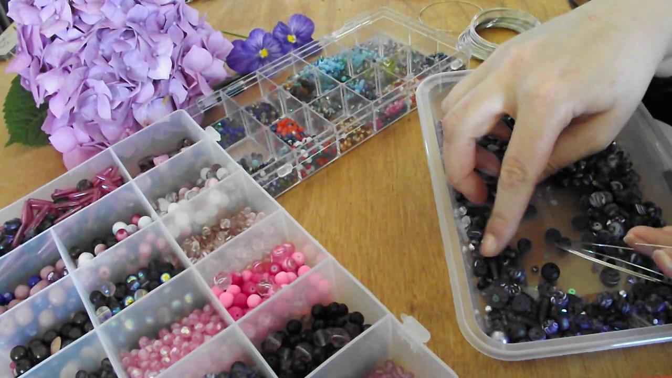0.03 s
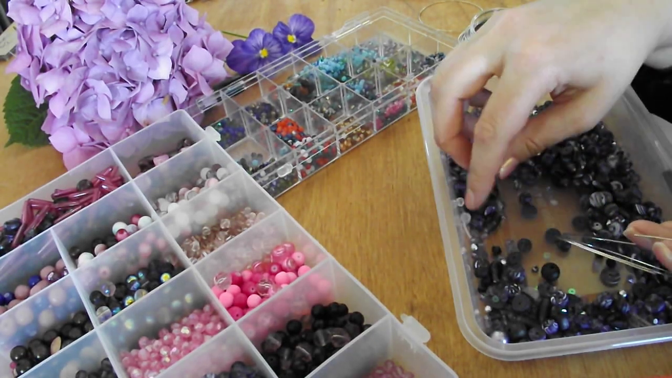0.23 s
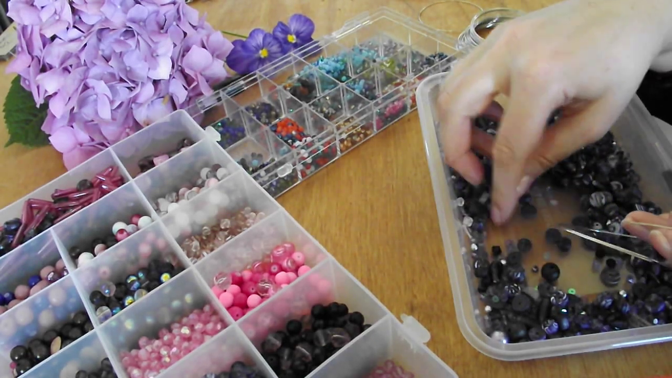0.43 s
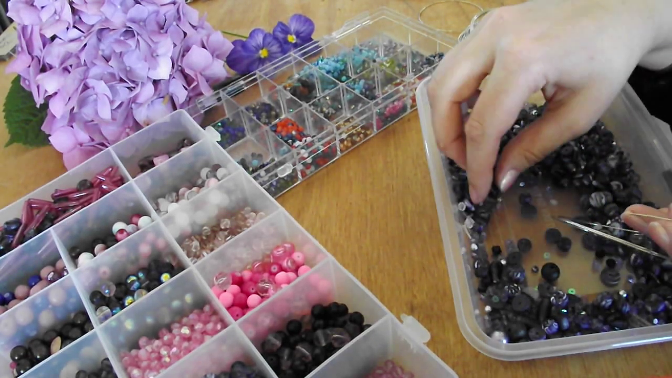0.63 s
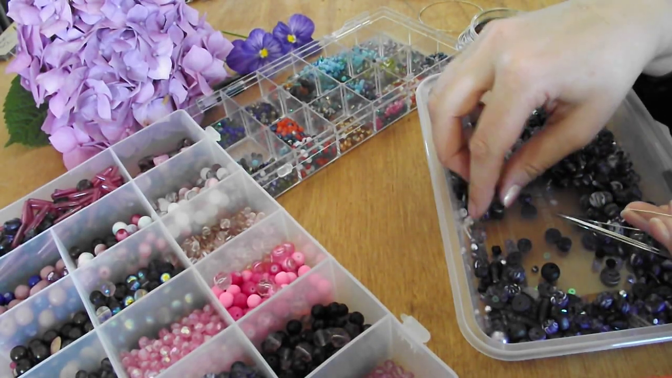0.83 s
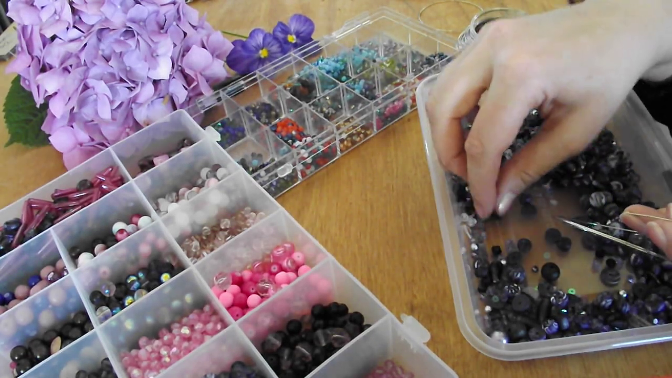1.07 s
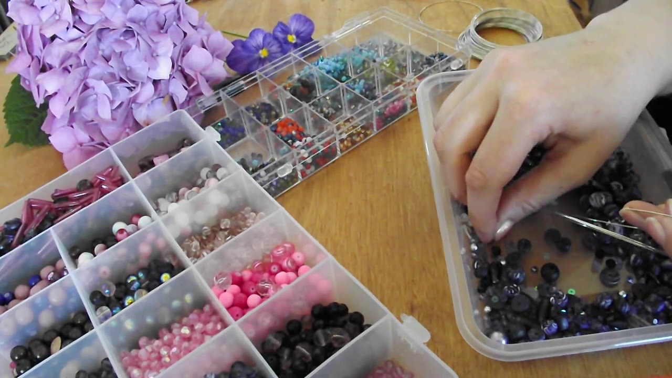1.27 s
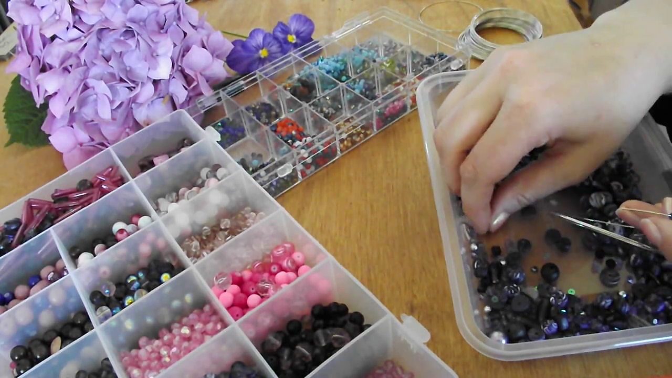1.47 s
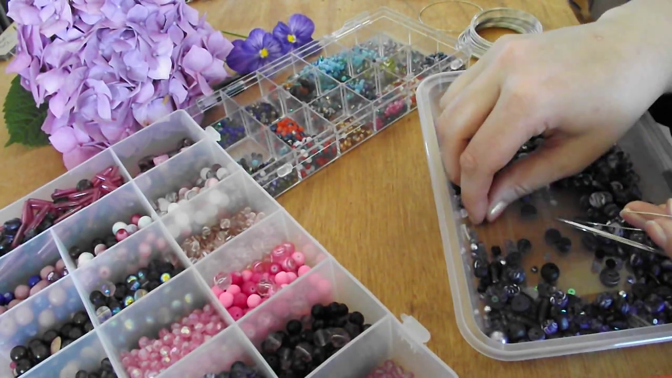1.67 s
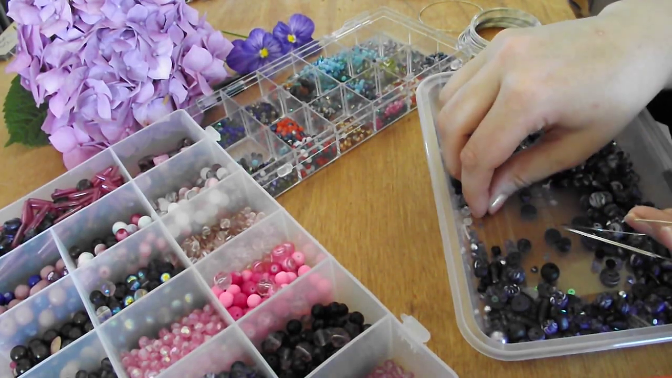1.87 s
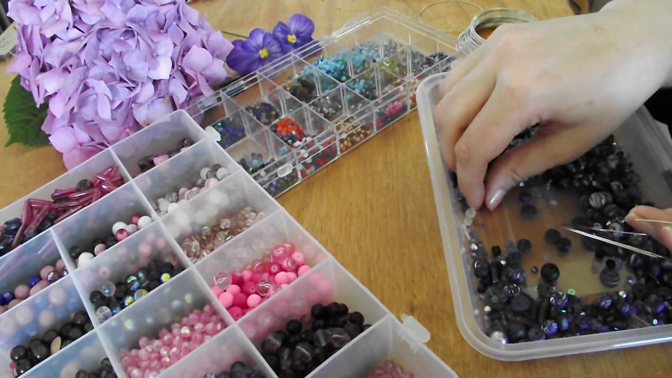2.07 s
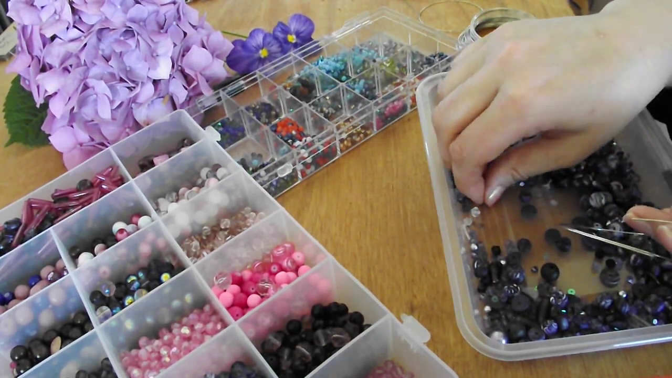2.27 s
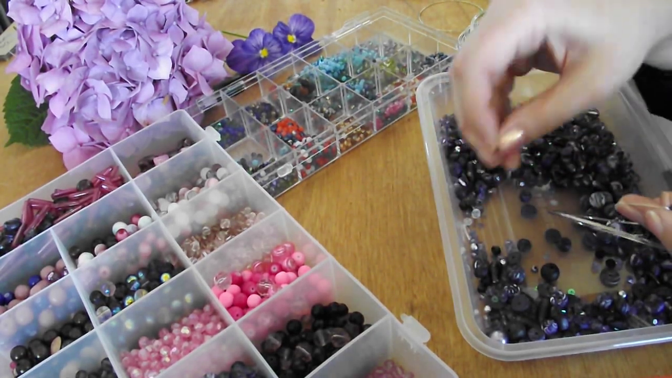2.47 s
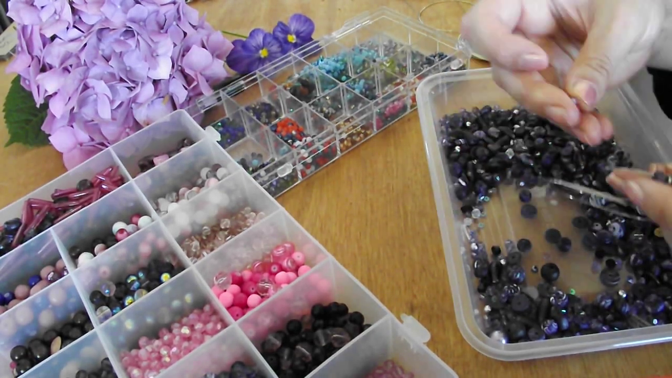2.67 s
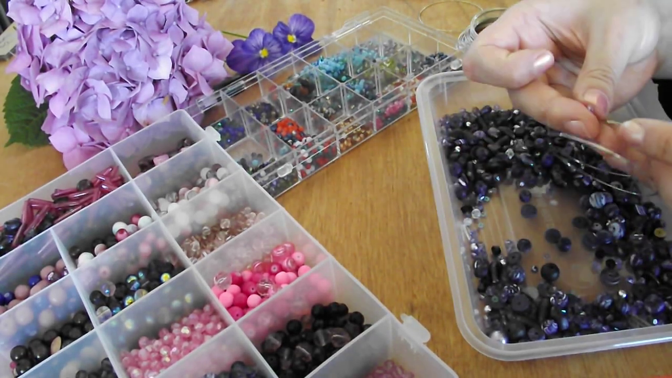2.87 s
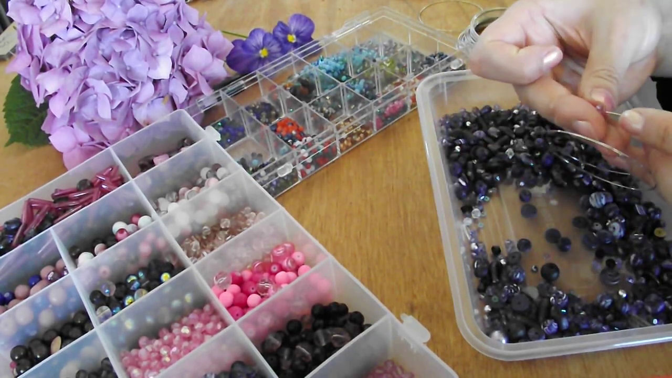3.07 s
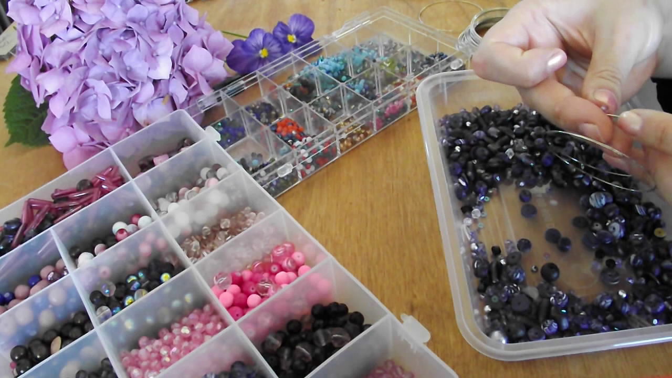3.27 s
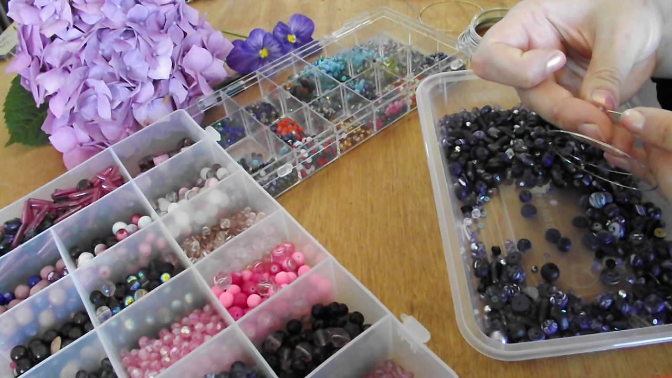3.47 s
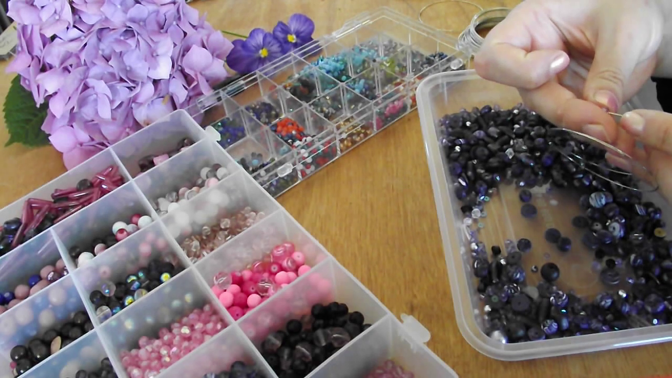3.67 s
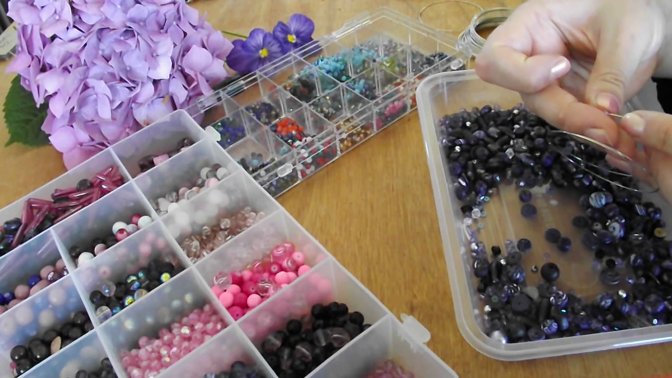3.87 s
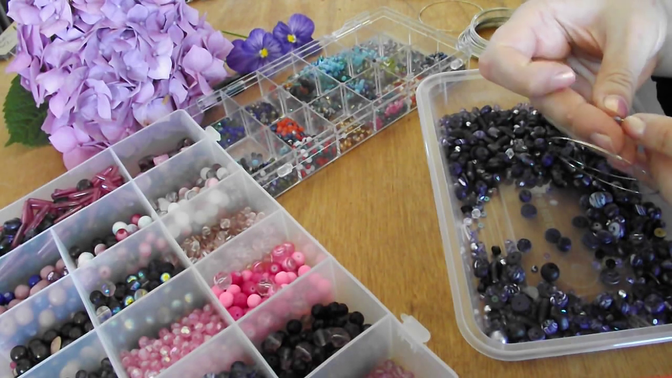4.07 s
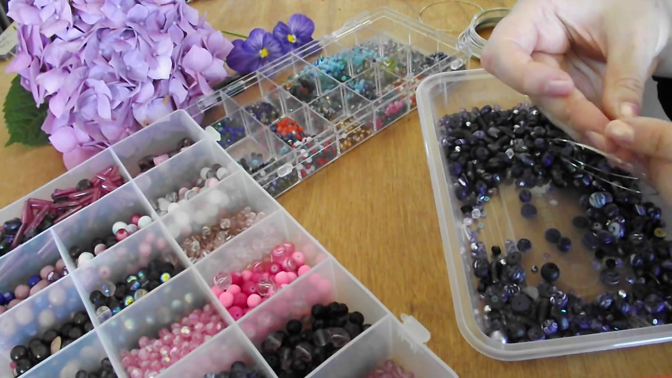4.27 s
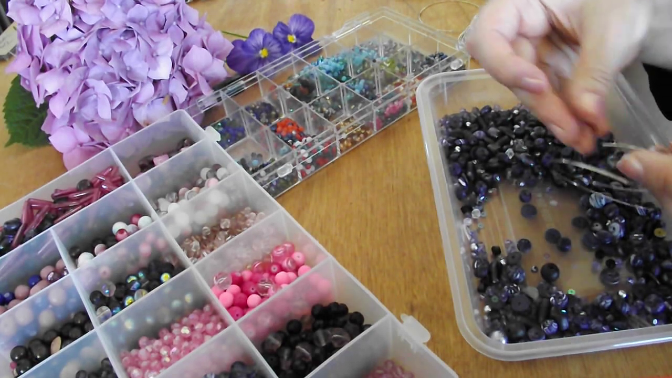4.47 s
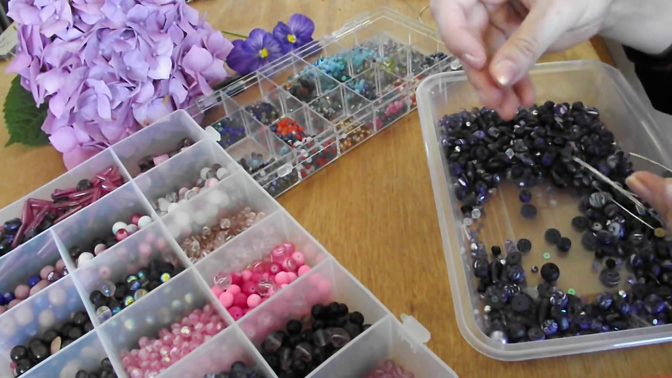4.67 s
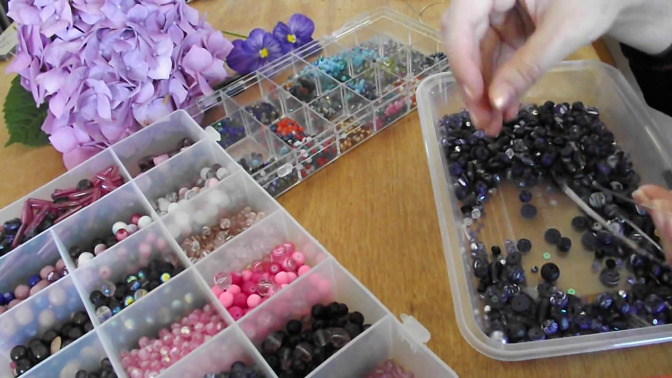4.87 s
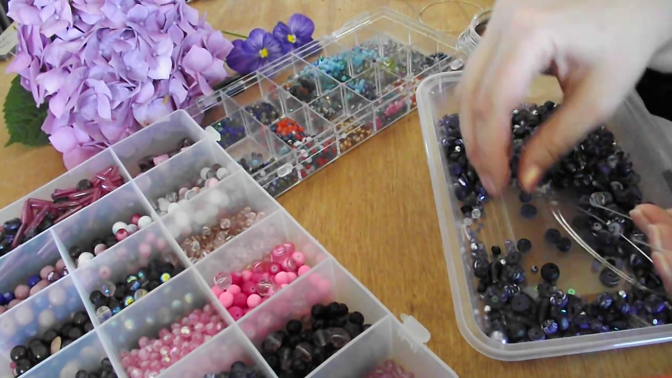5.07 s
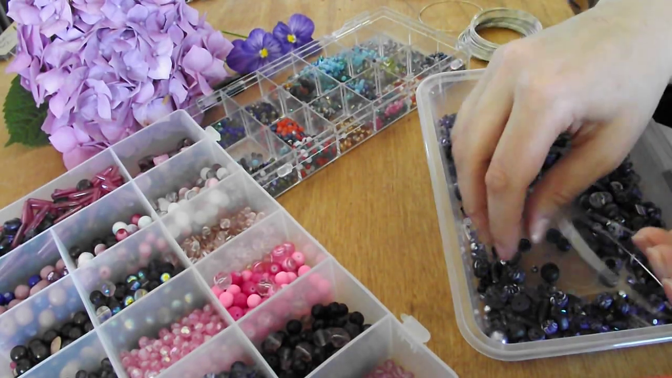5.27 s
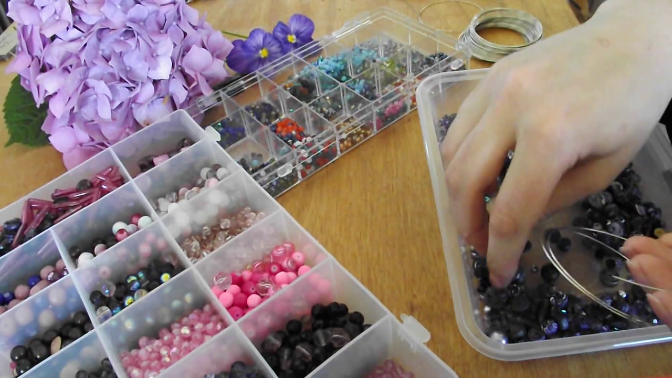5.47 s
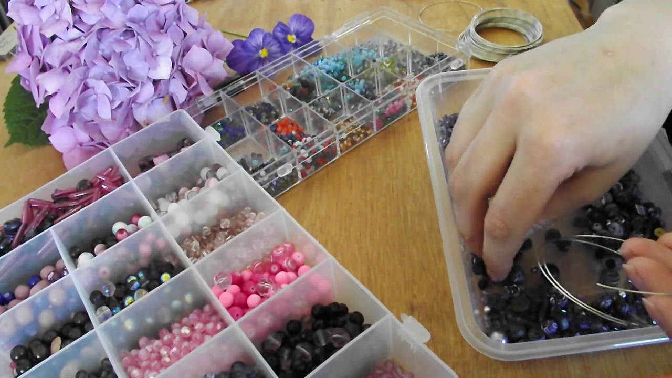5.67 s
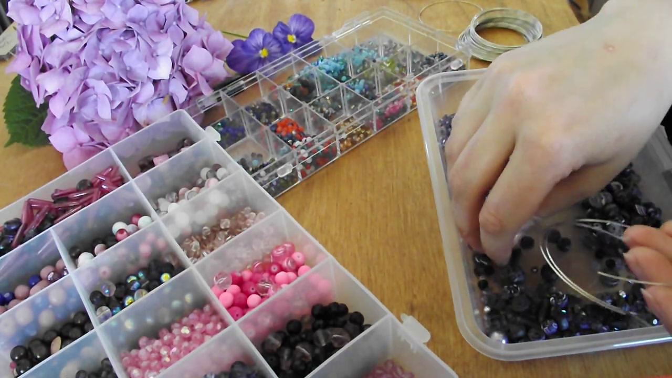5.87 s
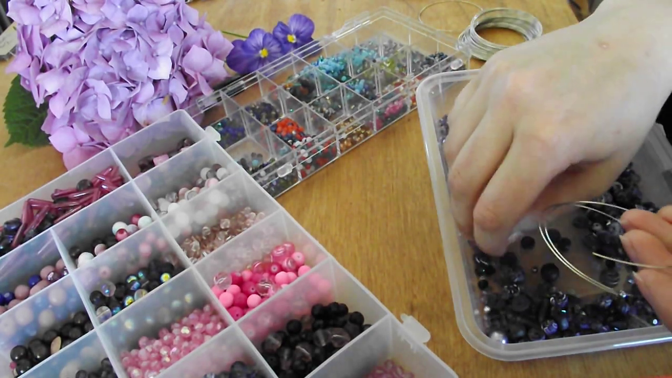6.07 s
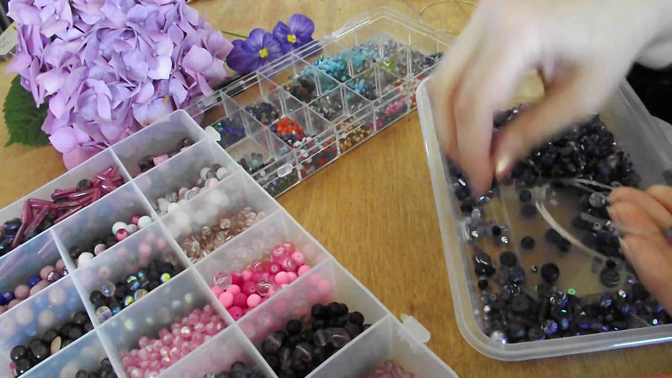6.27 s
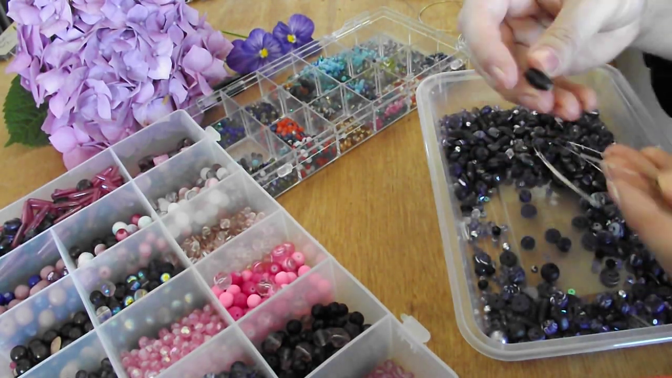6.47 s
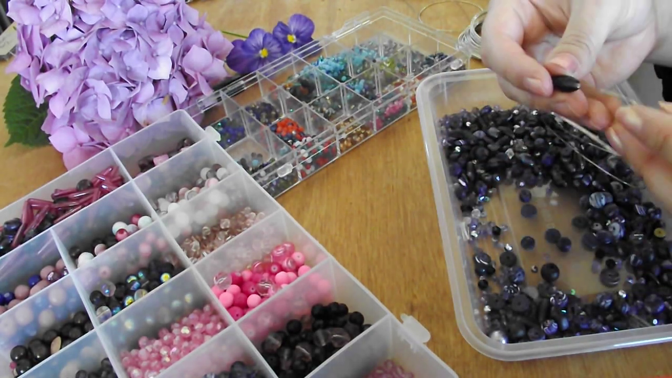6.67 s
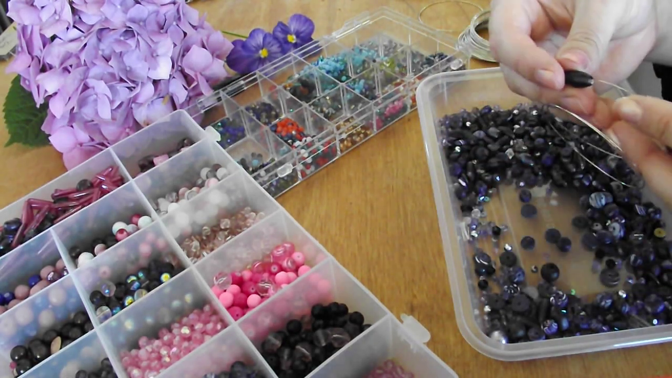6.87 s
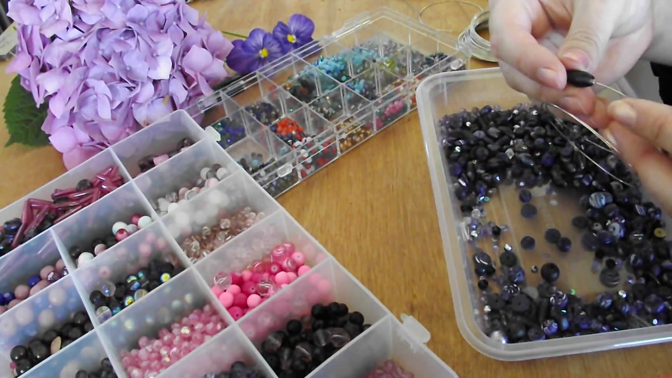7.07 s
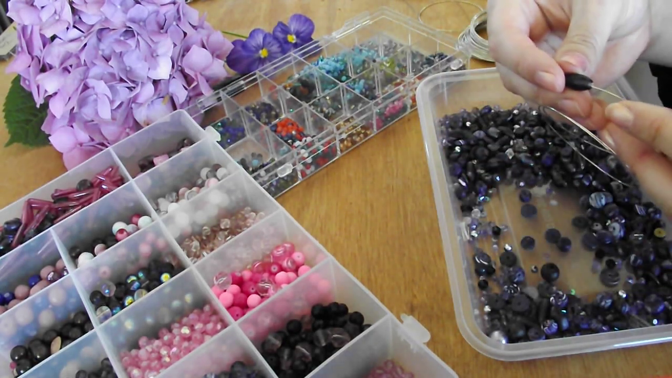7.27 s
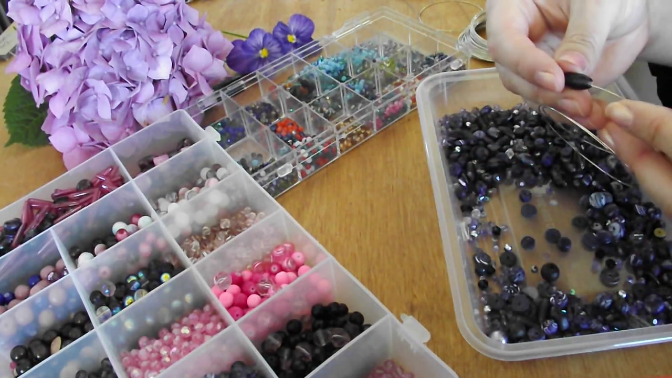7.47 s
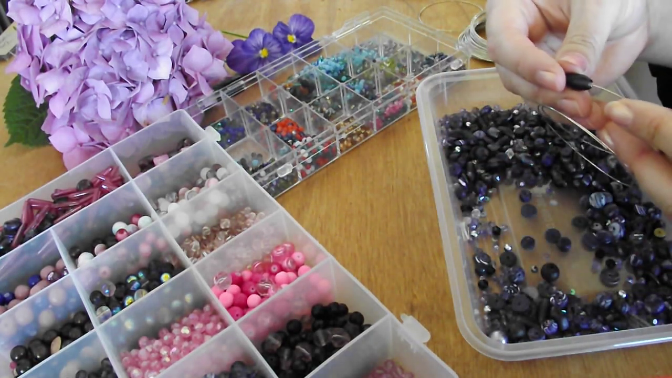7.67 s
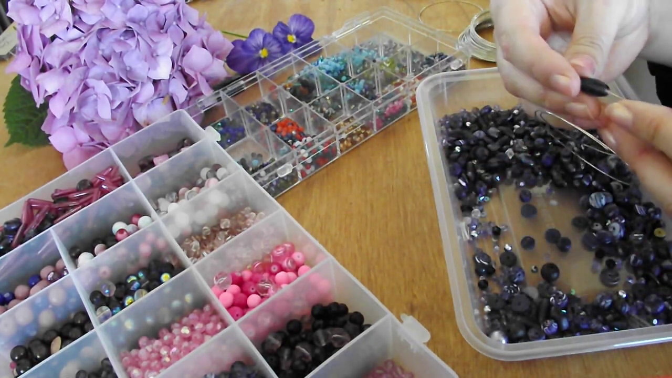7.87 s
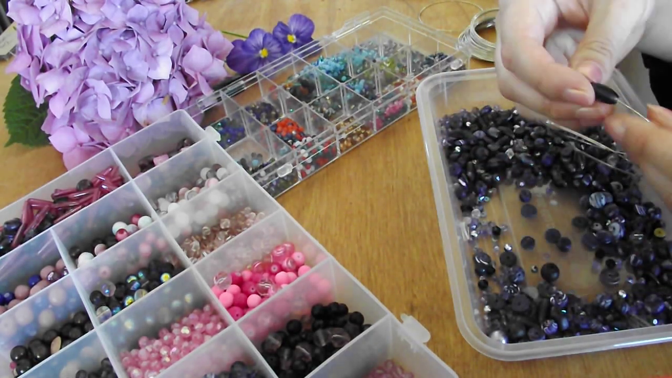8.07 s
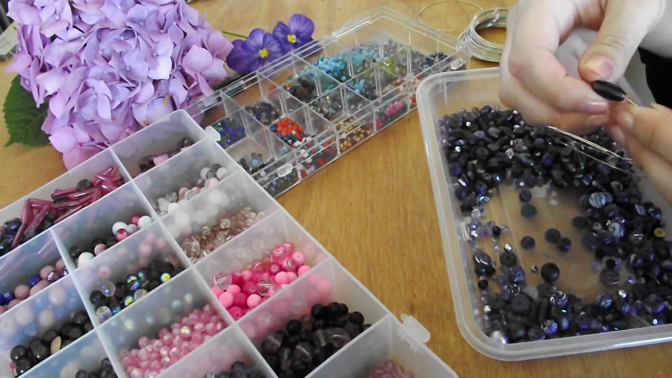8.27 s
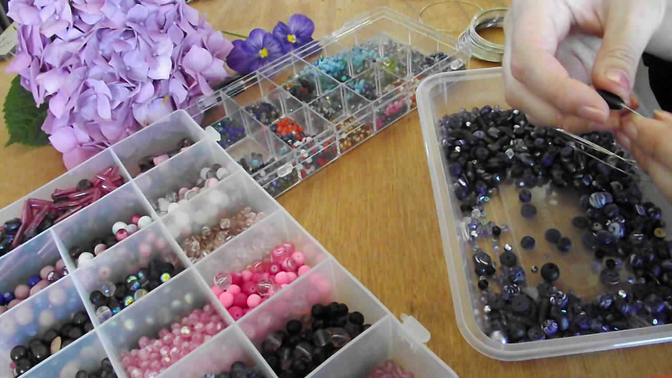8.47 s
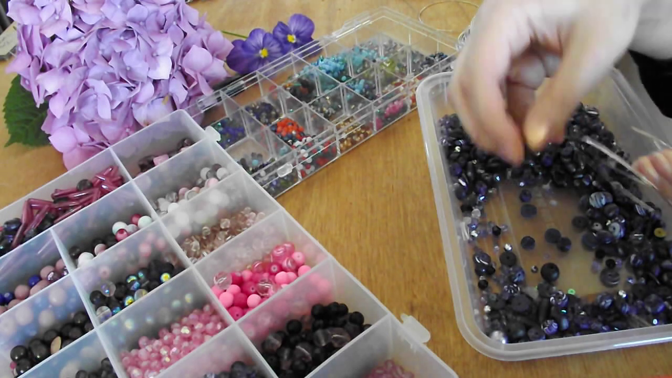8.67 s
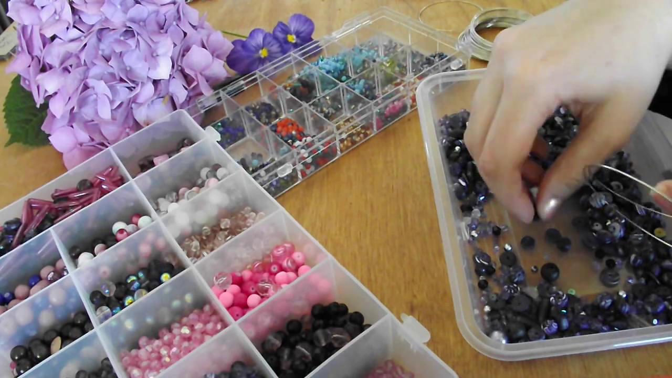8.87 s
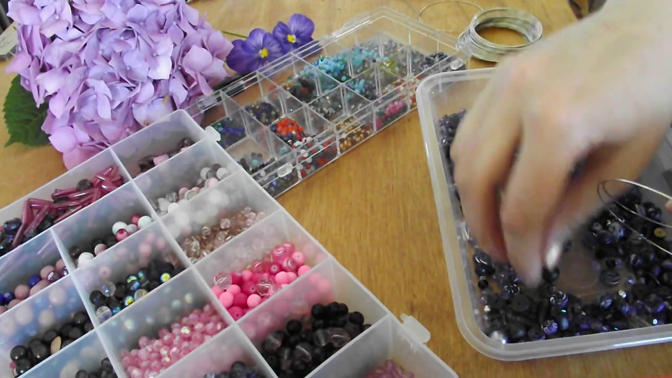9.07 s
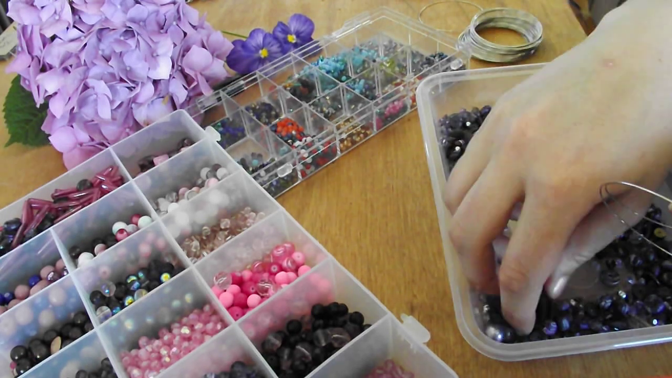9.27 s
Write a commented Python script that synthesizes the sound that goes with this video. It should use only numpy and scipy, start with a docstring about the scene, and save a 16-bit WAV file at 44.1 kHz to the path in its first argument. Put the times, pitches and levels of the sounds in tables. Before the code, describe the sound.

Close up, fingers dig hard through loose glass beads in a plastic tray, giving dense, bright clicks, knocks and clinks. The strokes thin out and stop after two and a half seconds while a low drone swells and sinks. Quiet room hiss, rumble and motor hum remain. A short rattle returns mid-way, and another closes the scene.

```python
"""Fingers dig hard into loose glass beads in a plastic tray on a table, close up, while a low drone swells.
The strokes thin out and stop after about 2.5 s, where the drone peaks and sinks back under steady room hiss,
rumble, a motor hum and a thin whine. Near 5.5 s a short bout returns, and drone and hum drop.
A last bout rattles from 8.7 s. Beads knock on the tray and clink on each other: each contact is a burst
of jolts ringing tray knock, tray wall, microphone cavity (near 3 kHz) and glass clink."""
import sys
import numpy as np
from scipy import signal
from scipy.io import wavfile
from scipy.ndimage import uniform_filter1d

SR = 44100
rng = np.random.default_rng(int(sys.argv[2]) if len(sys.argv) > 2 else 0)


def log_audio(samples):
    """Write samples as a 16-bit WAV file to the path given in sys.argv[1]."""
    # one column per channel
    frames = np.atleast_2d(samples).T
    # limit to full scale, then quantise
    limited = np.clip(frames, -1, 1)
    pcm = np.round(limited * 32767).astype(np.int16)
    wavfile.write(sys.argv[1], SR, pcm)


N = 410571  # length [samples]


def gain_of(db):
    """Decibels to amplitude gain."""
    return 10 ** (np.asarray(db) / 20)


def evened(x):
    """Scales to rms 1."""
    return x / np.sqrt(np.mean(x ** 2) + 1e-20)


def read_spectrum(points, hz):
    """A spectrum table read on a log-frequency axis."""
    f, level_db = np.transpose(points)
    return np.interp(np.log(hz + 1), np.log(f + 1), level_db)


def level_curve(rows):
    """A (time, level) table drawn as straight lines, sample by sample."""
    s, level_db = np.transpose(rows)
    return np.interp(np.arange(N) / SR, s, level_db)


def add(mix, s, sound):
    """Mixes a sound in from time s on."""
    part = mix[:, round(s * SR):][:, :sound.shape[1]]
    part += sound[:, :part.shape[1]]


def minimum_phase(gain, size=4096):
    """Most compact impulse response with the given gain: phase from the Hilbert transform of its logarithm."""
    log = np.log(np.maximum(gain, 1e-5))
    circle = np.r_[log, log[-2:0:-1]]
    spectrum = np.exp(np.conj(signal.hilbert(circle)))
    return np.fft.ifft(spectrum).real[:size // 4]


def narrow_noise(hz, width, steady):
    """A tone on a pitch curve [Hz]: a steady part plus noise wavering within about the width [Hz]."""
    r = np.exp(-np.pi * width / SR)
    once = signal.lfilter([1], [1, -r], rng.standard_normal((2, N)))
    slow = evened(signal.lfilter([1], [1, -r], once))
    phase = 2 * np.pi * np.cumsum(hz * np.ones(N)) / SR
    waver = steady + slow[0] + 1j * slow[1]
    return evened((waver * np.exp(1j * phase)).real)


def shaped_noise(colour, patchy_db):
    """Noise from random short-time spectra under one colour, with patches that drift in time and pitch."""
    frames, hz = N // 512 + 5, np.fft.rfftfreq(2048, 1 / SR)
    a, b, patches = rng.standard_normal((frames, 1025, 3)).T
    patches = uniform_filter1d(patches, size=20, axis=0)
    patches = evened(uniform_filter1d(patches, size=8, axis=1))
    level_db = read_spectrum(colour, hz)[:, None] + patchy_db * patches
    spectra = (a + 1j * b) * gain_of(level_db)
    return evened(signal.istft(spectra, nperseg=2048, noverlap=1536)[1][:N])


# colour of the room air through the microphone cavity: (frequency [Hz], relative density [dB per Hz])
HISS_COLOUR = [(300, -32.5), (550, -28.5), (950, -43), (1060, -20), (1390, -29), (1740, -11.5), (1820, -25),
               (2000, -16.5), (2500, -15), (2740, -2.5), (2870, -11.5), (3020, -2.5), (3200, -7.5),
               (4400, -25.5), (5000, -25), (5700, -31), (15700, -35.5)]


def hiss(hiss_db=-46, whine_hz=2807, whine_db=-61):
    """Room air heard through the same cavity as the beads, with a thin, nearly steady whine in it."""
    air = gain_of(hiss_db) * shaped_noise(HISS_COLOUR, patchy_db=1.24)
    return air + gain_of(whine_db) * narrow_noise(whine_hz, 0.45, 2.9)


# air rumble swelling and easing: (time [s], level [dB])
RUMBLE_LEVEL = [(0, -49), (2.5, -47.5), (4, -52.5), (6.5, -53.5), (8.4, -55.5), (9.31, -46.5)]
# colour of that rumble: (frequency [Hz], relative density [dB per Hz])
RUMBLE_COLOUR = [(30, 1.5), (60, -15), (95, -4), (300, -14.5), (600, -19.5), (1500, -20.5), (3000, -47)]


def rumble_and_hum(motor_hz=119, hum_db=-10, drop_db=13, drop_s=5.6):
    """Air rumble plus a motor tone set relative to it; the tone drops when the drone does."""
    rumble = shaped_noise(RUMBLE_COLOUR, patchy_db=0.5)
    motor_db = hum_db - drop_db * (np.arange(N) / SR > drop_s)
    hum = gain_of(motor_db) * narrow_noise(motor_hz, 2.1, 6.0)
    return gain_of(level_curve(RUMBLE_LEVEL)) * (rumble + hum)


# low drone swelling and fading: (time [s], level of its main tone [dB])
DRONE_LEVEL = [(0, -45), (1.25, -36), (1.45, -38.5), (2.3, -31), (2.62, -33.5), (2.85, -40), (4.8, -40),
               (5.55, -37), (5.7, -50), (7.5, -48), (9.31, -49)]


def drone(drone_hz=42.9, wander_hz=0.611, over_db=-15, shudder_hz=25, under_db=-9):
    """A low tone that wanders in pitch, with a weaker tone a fourth above and a shudder below."""
    hz = drone_hz + wander_hz * narrow_noise(0, 1., 0)
    low = narrow_noise(hz, 6.8, 1.05)
    over = gain_of(over_db) * narrow_noise(4 / 3 * hz, 4.0, 0.42)
    shudder = gain_of(under_db) * narrow_noise(shudder_hz, 9.2, 0)
    return gain_of(level_curve(DRONE_LEVEL)) * (low + over + shudder)


# fingertips bump the tray: (time [s], starting level [dB], pitch [Hz])
TRAY_BUMPS = [(0.022, -29.5, 545), (0.543, -26, 486), (1.385, -36.5, 314), (5.48, -39, 229),
              (5.851, -33.5, 354), (8.9123, -23, 330), (9.064, -31, 493), (9.168, -31, 490)]


def bumps(cycles=3.3):
    """A soft push rings the tray floor as a decaying sine, down to 1/e in about one cycle."""
    out, t = np.zeros((1, N)), np.arange(2000) / SR
    for s, db, hz in TRAY_BUMPS:
        ring = np.sin(2 * np.pi * hz * t) * np.exp(-np.pi * hz * t / cycles)
        add(out, s, gain_of(db) * ring[None])
    return out[0]


# a bead contact as the microphone colours it: (frequency [Hz], relative density [dB per Hz])
CONTACT_COLOUR = [(250, -33), (640, -28.5), (800, -24), (1000, -13), (1550, -16), (1950, -10), (2650, -12),
                  (3020, -2), (3350, -7.5), (3950, -13.5), (5000, -13.5), (6800, -20), (8600, -17),
                  (15700, -55.5)]


def contact_colours(knock_hz=2000, wall_hz=2700, clink_hz=4100):
    """The contact ring split by pitch, low to high: tray knock, tray wall, cavity ring, glass clink."""
    hz = np.fft.rfftfreq(4096, 1 / SR)
    below = [1 / (1 + (hz / edge) ** 12) for edge in (knock_hz, wall_hz, clink_hz)]
    shares = np.diff([0 * hz, *below, 1 + 0 * hz], axis=0)
    gain = gain_of(read_spectrum(CONTACT_COLOUR, hz))
    return np.array([minimum_phase(gain * share) for share in shares])


COLOURS = contact_colours()
# beads and tray spots differ, so pitch shifts from contact to contact:
# one spread per colour, (knock, wall, cavity, clink) [standard deviation of log pitch]
PITCH_SPREAD = [0.091, 0.038, 0.023, 0.059]


def contact(chance, rise_s, rattle_s, settle_db, settle_s, first_tick=1.26):
    """One contact in four colours, each of peak 1: a hard tick, then a few beads jolt in turn and settle."""
    t = np.arange(chance.shape[1]) / SR
    shaking = np.exp(-t / rattle_s) + gain_of(settle_db) * np.exp(-t / settle_s)
    jolts = chance[0] * gain_of(4.8 * chance[1])  # spiky, not smooth
    force = np.minimum(t / rise_s, 1) * shaking * jolts
    force[0] += first_tick * abs(force).max()  # tick against the largest jolt after it
    taps = COLOURS.shape[1]
    pitch = np.exp(np.multiply(PITCH_SPREAD, chance[0, -len(COLOURS):]))
    rings = [signal.resample(ring, round(taps / p))[:taps // 2] for ring, p in zip(COLOURS, pitch)]
    parts = signal.fftconvolve(force[None], np.array(rings), axes=1)
    return parts / abs(parts).max(axis=1, keepdims=True)


# strokes of the fingers through the beads: (start [s], rise [s], hold [s], cavity ring level [dB],
# tray knock [dB re ring], tray wall [dB re ring])
STROKES = [(0.016, 0.005, 0.073, -25, -13.5, -12), (.07, 0.018, 0.081, -27.5, -17.5, -6),
           (.17, 0.031, 0.027, -32.5, -11, -18), (0.382, 0.0047, .23, -22.5, -12.5, -11.5),
           (.68, 0.019, 0.022, -41.5, -12, -2), (.772, .01, 0.11, -25.5, -16, -10.5),
           (.93, 0.015, 0.14, -49.5, -3, -6), (1.332, 0.039, .21, -32, -17, -18),
           (1.603, 0.11, 0.024, -41, -13, -19), (1.828, 0.028, 0.032, -39.5, -10.5, -9.5),
           (1.939, 0.032, 0.014, -33, -10, -15), (2.03, 0.022, 0.081, -45.5, -19, -15),
           (2.12, 0.048, 0.013, -32.5, -19, -18), (2.255, 0.038, 0.071, -33, -16, -23),
           (2.35, 0.03, 0.041, -37, -16, -13), (2.53, 0.024, 0.04, -48.5, -13, -18),
           (5.469, 0.0049, 0.048, -30.5, -18.5, -5), (5.55, 0.024, 0.012, -32, -23, -16),
           (5.63, 0.024, 0.036, -37.5, -17.5, -6.5), (5.73, 0.03, 0.057, -37.5, -15, -13),
           (5.83, 0.0088, 0.097, -39, -18, -8), (6.055, 0.013, 0.035, -32, -14, -8),
           (8.68, 0.022, 0.063, -45, -7, -7), (8.91, 0.0034, 0.021, -29.5, -9, -10),
           (9.015, 0.017, 0.069, -30.5, -9, -3), (9.161, 0.005, 0.018, -23, -13.5, -7),
           (9.21, 0.036, .1, -30, -13, -13)]


def stroke_levels(rise_from_db=-25, sag_db_per_s=31.5, settle_db_per_s=233, clink_db=-12.5):
    """Gain of the four colours: each stroke swells, sags while it holds, and dies as the beads settle."""
    level, t = np.zeros((4, N)), np.arange(N) / SR
    for start, rise, hold, db, knock_db, wall_db in STROKES:
        top, end = start + rise, start + rise + hold
        sag_db = -sag_db_per_s * hold
        points_db = [rise_from_db, 0, sag_db, sag_db - settle_db_per_s]
        shape_db = np.interp(t, [start, top, end, end + 1], points_db)
        colour_db = db + np.array([[knock_db], [wall_db], [0], [clink_db]])
        level += gain_of(colour_db) * gain_of(shape_db) * (t >= start)
    return level


def stirring(per_s=850, spread_db=2.5, colour_db=1.0, count=32):
    """Many small contacts of many shapes; a few are large, and each is duller or brighter by chance."""
    size = gain_of(spread_db * np.minimum(rng.exponential(1, N), 4))
    hits = size * (rng.random(N) < per_s / SR)
    train = hits * gain_of(colour_db * rng.standard_normal((4, N)) * [[1], [1], [.5], [2]])
    shape, out = rng.integers(0, count, N), np.zeros((4, N))
    for k, chance in enumerate(rng.standard_normal((count, 2, 600))):
        sound = contact(chance, rise_s=.0003, rattle_s=.0004, settle_db=-19, settle_s=.004)
        out += signal.oaconvolve(train * (shape == k), sound, axes=1)[:, :N]
    return np.array([evened(part) for part in out]) * stroke_levels()


# the clear clicks: (time [s], cavity ring peak [dB], tray knock [dB re ring], bead clink [dB re ring])
CLICKS = [(0.0214, -11, -12.5, -6), (0.047, -14, -19, -1), (0.0794, -8.5, -5.5, -5.5),
          (0.088, -13, -31, -5), (0.0968, -3.5, -16, -3.5), (0.1033, -3.5, -27, -21),
          (0.1183, -8, -11, -19), (0.1335, -11.5, -10, -2.5), (0.136, -14, -14, -15), (0.149, -24, -17, -8),
          (0.2, -12, -7.5, -13), (0.2197, -14.5, -7.5, -6.5), (0.388, -6, -20.5, -10.5),
          (0.4016, -20, -24, -25), (0.4119, -4.5, -41, -30), (0.4228, -11, -43, -27.0),
          (0.439, -5, -22, -22), (0.451, -7, -13.5, -5.5), (0.4774, -16, -21, -13), (0.4827, -12, -7, -21),
          (0.5127, -13.5, -11, -8), (0.54, -10.5, -10, -11), (0.5439, -6.5, -29, -21),
          (0.573, -19, -20, -20), (0.5813, -10.5, -11, -12.5), (0.605, -14, -32, -25),
          (0.692, -17.5, -43.5, -9), (0.7768, -13.5, -14, -20), (0.7863, -14.5, -16, -2.5),
          (0.809, -12.5, -21, -10), (0.824, -14, -22, -9), (0.854, -17, -16, -28), (0.8954, -7.5, -47, -15),
          (0.947, -14, -24, -16), (0.9741, -13, -45, -15), (1.023, -24, -19, -11), (1.3361, -16, -21, -16),
          (1.352, -20, -30, -16), (1.363, -23, -27, -23), (1.3731, -26, -22, -12),
          (1.3836, -20.5, -16, -22), (1.431, -33.5, -22, 9), (1.459, -17.5, -29, -8),
          (1.5008, -17.5, -10, -9), (1.5214, -20, -16, -24), (1.569, -21, -19, -12),
          (1.631, -16, -15, -6.5), (1.6651, -15.5, -27, -15), (1.8863, -15, -25, -8),
          (1.9856, -15, -12.5, -9), (2.1693, -13, -30, -22), (2.1728, -18.5, -47, 0), (2.205, -27, -18, -6),
          (2.267, -18, -20, -13), (2.2805, -18, -18, -24), (2.3028, -4, -20, -14), (2.3575, -26, -2, -16),
          (2.3646, -18.5, -12, -21), (2.3917, -19, -15, -10), (2.3964, -16.5, -11, -19),
          (2.4324, -29, -20, 0), (5.4903, -25, -32, -17), (5.5146, -15.5, -14.5, -9),
          (5.5246, -15.5, -26, -3.5), (5.5988, -9, -20, -7.5), (5.6574, -19.5, -28, -20),
          (5.6613, -26, -26.0, 1), (5.722, -19.5, -11, -5), (5.8038, -17, -23, -14),
          (5.8105, -23, -30, -10), (5.85, -14.5, -12, -12), (5.8653, -13, -15, -5), (5.9004, -18, -39, -15),
          (6.066, -17, -22, -25.0), (6.0888, -11, -16, -4.5), (6.112, -7.5, -20.5, -16),
          (6.487, -34.5, -12, -15), (6.5265, -33, -23, -10), (6.6207, -32.5, -18, -10.0),
          (8.9111, -5, -7.5, -9.5), (8.9368, -18, 1, -17), (8.9844, -8, -5.5, -17.5),
          (9.018, -9, -14, -4.5), (9.0402, -10, -5, -15), (9.062, -15, -5, -25), (9.07, -6, -15, -14),
          (9.1015, -22, -19, -10), (9.1125, -15, -22, -22), (9.1257, -18, -26, -17), (9.165, -20, -27, -19),
          (9.1732, -13.5, -30, -4.5), (9.1807, -20, -27, -12), (9.194, -17, -9.5, -12),
          (9.2595, -19, -12, 2)]


def clicks(wall_db=-8, with_knock=0.52):
    """Each clear contact with its own mix; the tray wall sounds more when the knock does."""
    out = np.zeros((4, N))
    chances = rng.standard_normal((len(CLICKS), 2, 2000))
    for (s, db, knock_db, clink_db), chance in zip(CLICKS, chances):
        sound = contact(chance, rise_s=0.00025, rattle_s=0.00045, settle_db=-17, settle_s=0.006)
        mix_db = [[knock_db], [wall_db + with_knock * knock_db], [0], [clink_db]]
        add(out, s, sound * gain_of(db + np.array(mix_db)))
    return out


def beads(room_db=-16, t60=0.76):
    """Clicks, strokes and bumps, given a short tail of decaying noise by the table and walls."""
    close = (clicks() + stirring()).sum(0) + bumps()
    t = np.arange(SR // 2) / SR
    tail = rng.standard_normal(len(t)) * gain_of(-60 * t / t60) * (t > .004)
    tail /= np.linalg.norm(tail)
    return close + gain_of(room_db) * signal.oaconvolve(close, tail)[:N]


def scene():
    """Background and beads all reach one microphone, the same on both channels."""
    sound = hiss() + rumble_and_hum() + drone() + beads()
    return np.array([sound, sound])


def record(dry, wide_hz=2100, bass_side=0.056, edge_hz=16000):
    """Left lags by one sample, mostly the treble differs between the channels; then the band limit."""
    left, right = np.r_[0, dry[0, :-1]], dry[1]
    difference = left - right
    high_pass = signal.butter(2, wide_hz, "high", fs=SR, output="sos")
    treble = signal.sosfiltfilt(high_pass, difference)
    side = (treble + bass_side * (difference - treble)) / 2
    both = (left + right) / 2 + np.array([side, -side])
    band = signal.firwin(511, edge_hz, window=("kaiser", 9), fs=SR)
    return signal.oaconvolve(both, band[None], "same")


dry = scene()
out = record(dry)
log_audio(out)
```